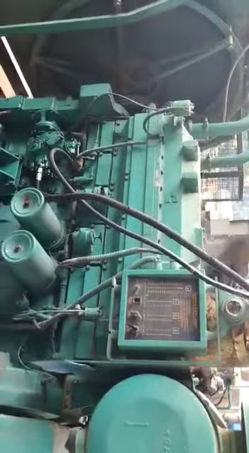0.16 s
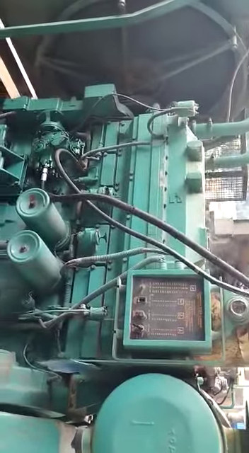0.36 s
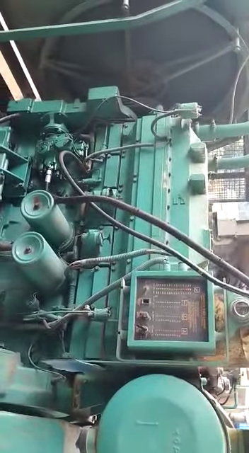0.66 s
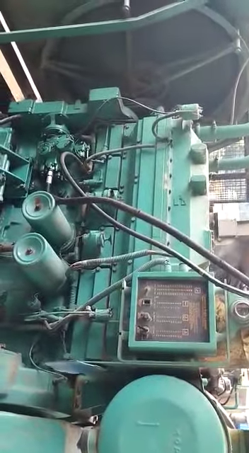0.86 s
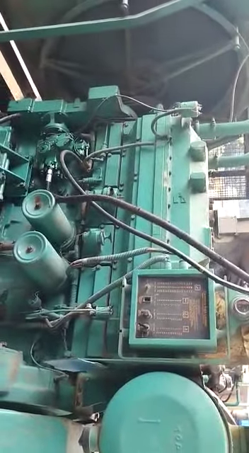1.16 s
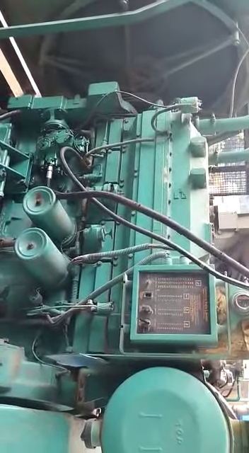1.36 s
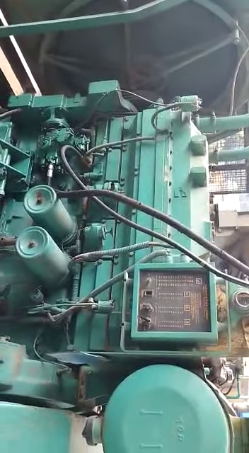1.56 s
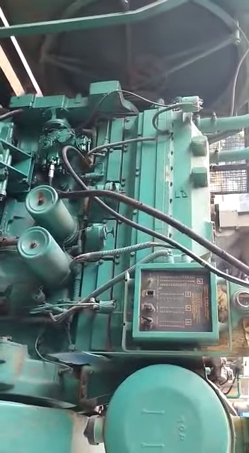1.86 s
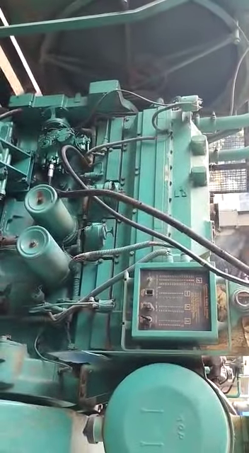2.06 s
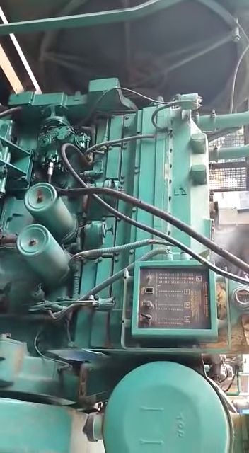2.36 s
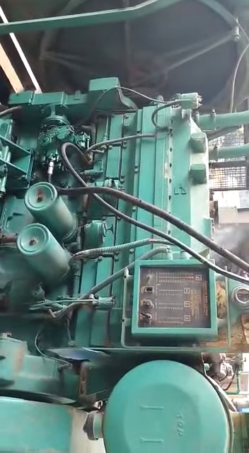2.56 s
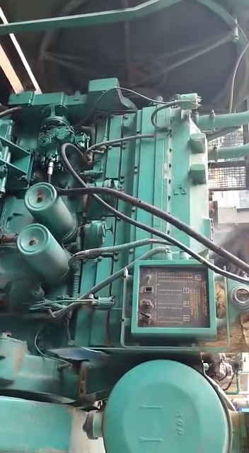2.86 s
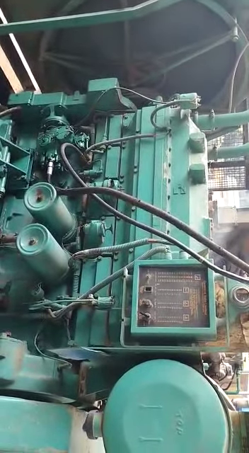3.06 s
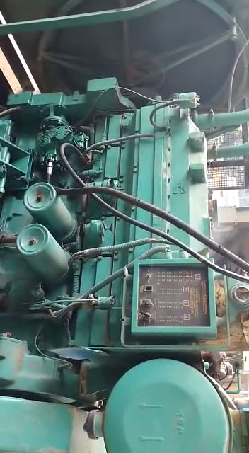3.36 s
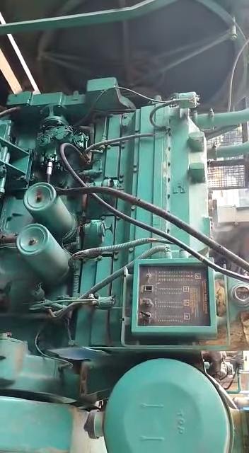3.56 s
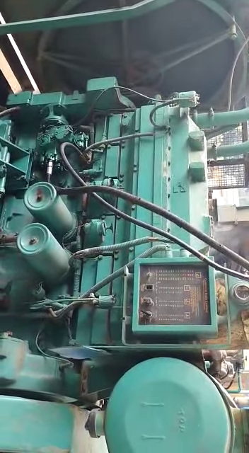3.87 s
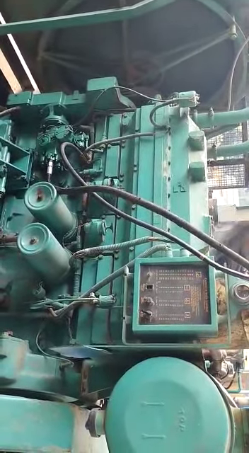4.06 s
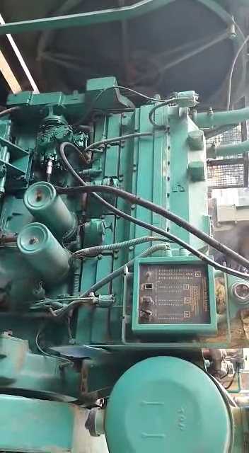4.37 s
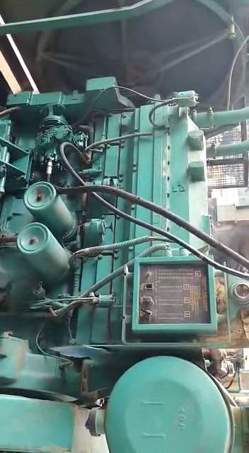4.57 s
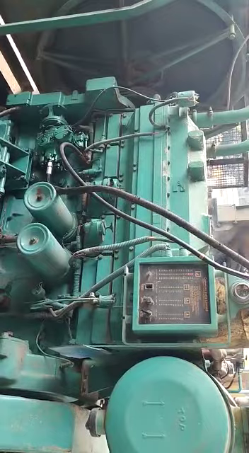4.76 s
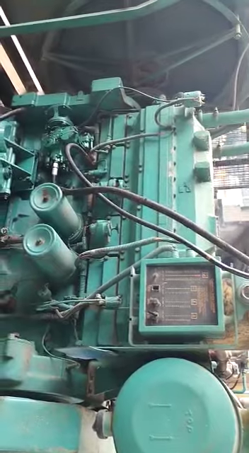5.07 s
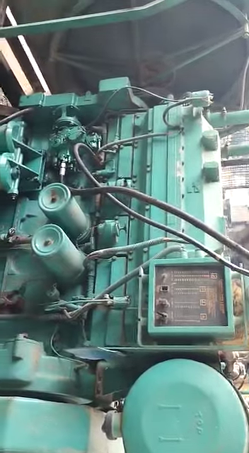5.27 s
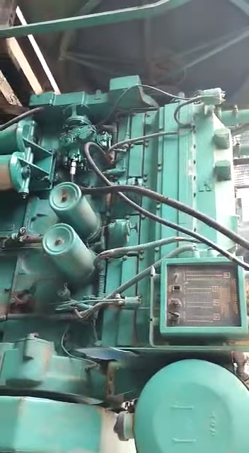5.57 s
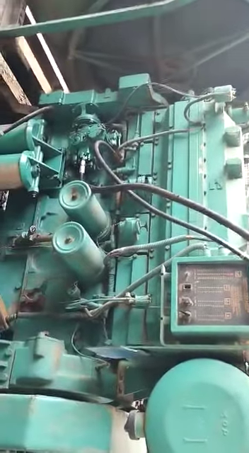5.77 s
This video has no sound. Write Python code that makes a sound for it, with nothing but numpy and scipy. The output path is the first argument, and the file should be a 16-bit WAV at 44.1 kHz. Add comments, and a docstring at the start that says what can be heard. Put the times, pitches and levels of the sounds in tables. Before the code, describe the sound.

A large six-cylinder diesel generator runs steadily at arm's length, humming in many tones, with growl, fan roar, casing clatter and uneven ticking.

```python
"""Diesel generator in a shed

A six-cylinder diesel generator runs at governed speed in its shed, an arm's length away.
Sines at firing and shaft orders make a many-toned hum, and a repeated waveform makes the block growl
the same way every cycle. Shaped noise makes the fan and exhaust roar and the casing clatter; noise
bursts make the injectors and valve gear tick in a limping pattern of six."""
import sys
import numpy as np
from scipy.fft import rfft, irfft, next_fast_len
from scipy.io import wavfile
from scipy.ndimage import uniform_filter1d, minimum_filter1d, map_coordinates

SR = 44100
rng = np.random.default_rng(int(sys.argv[2]) if len(sys.argv) > 2 else 0)


def unload_audio(sound):
    """Save the sound as a 16-bit wav file, at the path given as the first command line argument."""
    columns = np.transpose(np.atleast_2d(sound))
    # keep every value between -1 and 1, then stretch to whole-number steps
    steps = np.round(np.clip(columns, -1, 1) * 32767)
    wavfile.write(sys.argv[1], SR, steps.astype(np.int16))


N = 261513
CYLINDERS = 6
CYCLE_HZ = 14.915  # four-stroke cycles a second, two turns of the crank each


def amp(db):
    """Logarithmic level: decibels to amplitude gain."""
    return 10 ** (np.asarray(db) / 20)


def unit(x):
    """Power normalization: scale to rms 1."""
    return x / np.sqrt(np.mean(x ** 2) + 1e-20)


def along(points, hz):
    """Logarithmic interpolation: read (f/Hz, value) points on a log frequency axis."""
    f, v = np.transpose(points)
    return np.interp(np.log(hz + 1), np.log(f + 1), v)


def wobble(rate):
    """Band-limited fluctuation: a smooth random curve with rate knots a second."""
    knots = rng.standard_normal(int(N * rate / SR) + 4)
    coarse = np.arange(0, N + 64, 64)
    curve = map_coordinates(knots, [coarse * rate / SR])
    return np.interp(np.arange(N), coarse, curve)


def filtered(x, response):
    """Linear filtering: multiply the spectrum of x by a response of frequency."""
    m = next_fast_len(N + SR // 4)
    hz = np.fft.rfftfreq(m, 1 / SR)
    return irfft(rfft(x, m) * response(hz), m)[..., :N]


# likeness of the sound at the two microphones: f/Hz, left-right correlation
LIKENESS = [(30, 0.85), (90, 1), (220, 0.99), (380, 0.92), (660, 0.85), (870, 0.44), (1200, 0.45),
            (1700, 0.13), (2400, 0.012), (9000, 0.3)]


def spread(hz):
    """Spatial coherence: angle (rad) between mid and side; bass is shared, treble is diffuse."""
    return np.arccos(np.clip(along(LIKENESS, hz), -1, 1)) / 2


def rush(spectrum):
    """Coloured noise: random stereo sound of rms 1, so its spectrum sets only relative levels."""
    def mid_and_side(hz):
        return amp(along(spectrum, hz)) * [np.cos(spread(hz)), np.sin(spread(hz))]

    mid, side = filtered(rng.standard_normal((2, N)), mid_and_side)
    return unit(np.array([mid + side, mid - side]))


def crank(hunt=.002, shake=0.00048):
    """Phase modulation: engine cycles elapsed, as the governor hunts and no two cycles are quite alike."""
    steady = CYCLE_HZ * np.arange(N) / SR
    return steady + hunt * wobble(1.995) + shake * wobble(20)  # both depths in cycles


# roar of fan and exhaust: f/Hz, relative level per Hz/dB
ROAR_SPECTRUM = [(10, -21), (30, -23), (62, -14), (95, 0), (130, -7.5), (175, 1), (290, -1.5), (380, -7),
                 (490, -11), (680, -10), (1000, -23.5), (2500, -29.5), (7000, -37.5), (11000, -50)]


def fan():
    """Broadband flow noise: cooling air and exhaust roar in the shed, swelling at random."""
    gusts = amp(1.3 * wobble(7))
    return amp(-14.5) * unit(rush(ROAR_SPECTRUM) * gusts)


# the block's many weak orders, before random scatter: f/Hz, rms level of each order/dB
BLOCK_ORDERS = [(15, -52), (30, -32.5), (75, -41.5), (140, -30), (300, -31), (420, -42), (600, -37.5),
                (780, -35), (880, -45), (1300, -46.5), (2000, -52), (3000, -62), (4000, -61)]


def growl(cycle, strong, count=270, size=8192):
    """Fourier synthesis: the block repeats one waveform, filling in the orders between the strong tones."""
    orders = np.arange(count)
    hz = orders * CYCLE_HZ
    taken = [0] + [round(multiple) for multiple, db in strong]
    weak = ~np.isin(orders, taken)
    level = weak * amp(along(BLOCK_ORDERS, hz) + 1.4 * rng.standard_normal(count))
    start = rng.uniform(0, 2 * np.pi, count)
    # opposite phase shifts at the two microphones set their likeness
    angle = start + rng.choice([-1, 1], count) * spread(hz) * np.array([[1], [-1]])
    one_cycle = irfft(level * np.exp(1j * angle), size) * size / np.sqrt(2)
    place = np.arange(size) / size
    return np.array([np.interp(cycle % 1, place, port, period=1) for port in one_cycle])


def tones(cycle, table, waver, waver_rate):
    """Order synthesis: sines locked to the crank, each wavering on its own in the moving air."""
    out = np.zeros((2, N))
    for multiple, db in table:
        order = round(multiple)
        start = rng.uniform(0, 2 * np.pi)
        shift = rng.choice([-1, 1]) * spread(order * CYCLE_HZ)
        ports = np.exp(1j * (start + shift * np.array([[1], [-1]])))
        # the complex factor wavers both level and phase
        sway = 1 + waver * (wobble(waver_rate) + 1j * wobble(waver_rate))
        turning = np.exp(2j * np.pi * order * cycle)
        out += np.sqrt(2) * amp(db) * (ports * sway * turning).real
    return out


# thin whine of the pump drive, before wavering: multiple of the cycle rate, rms level/dB
PUMP_WHINE = [(87, -40), (103, -44)]
MESH_ORDER = 28  # gear teeth that meet in one cycle
GEAR_FIRST_DB, GEAR_DB = -37.5, -48.5  # rms before wavering: lowest mesh overtone heard, each one above


def gear_series(order=3, count=5):
    """Gear-mesh harmonics: the timing gears sing from the given order upwards; the lowest stands out."""
    return [(MESH_ORDER * k, GEAR_FIRST_DB if k == order else GEAR_DB)
            for k in range(order, order + count)]


def whine(cycle, table):
    """Tonal excitation at tooth-meeting rates: gears and pump drive waver strongly."""
    return tones(cycle, table, waver=0.53, waver_rate=12)


# firing tone and overtones: level up to a knee, then falling away
FIRING_DB, FIRING_KNEE_HZ, FIRING_FALL_DB_PER_OCTAVE = -18, 171.7, 10.5


def firing_series(count=9):
    """Harmonic series: the firing rate and its overtones, as (multiple of the cycle rate, level/dB)."""
    orders = CYLINDERS * np.arange(1, count + 1)
    octaves = np.log2(np.maximum(orders * CYCLE_HZ / FIRING_KNEE_HZ, 1))
    return list(zip(orders, FIRING_DB - FIRING_FALL_DB_PER_OCTAVE * octaves))


# shaft orders that frame and panels ring with, before wavering: multiple of the cycle rate, rms level/dB
PANEL_ORDERS = [(14, -21.5), (16, -26), (17, -19.5), (20, -18), (26, -21.5), (34, -30.5), (45, -28),
                (46, -30), (48, -31.5)]


def hum(cycle, table):
    """Forced vibration: firing and shaft orders drive frame and panels with nearly steady tones."""
    return tones(cycle, table, waver=.08, waver_rate=7)


# one tick for each cylinder: place in the cycle (0-1), relative sizzle level/dB, relative ring level/dB
CYLINDER_TICKS = [(.117, -2.5, 3.5), (.292, -3, 0), (.437, -5, 3), (.625, -19, -22), (.790, 1.5, 7.5),
                  (.972, -4, 2)]


def blows(cycle, levels_db, attack, t60, scatter_db, between_db):
    """Impact envelope of rms 1: each cylinder's blow rises fast and dies away over a steady rattle."""
    power = np.full(N, amp(between_db) ** 2)
    for (place, _, _), db in zip(CYLINDER_TICKS, levels_db):
        turn, part = np.divmod(cycle - place + 2, 1)
        age = part / CYCLE_HZ  # s since this cylinder's last blow
        strength = amp(db + scatter_db * rng.standard_normal(size=128))[turn.astype(int)]
        rise = 1 - np.exp(-age / attack)
        decay = amp(-60 * age / t60)
        power += (strength * rise * decay) ** 2
    return unit(np.sqrt(power))


# combustion clatter of the casing: f/Hz, relative level per Hz/dB
CLATTER_SPECTRUM = [(200, -40), (450, -5), (680, 2), (900, -1.5), (1300, -3.5), (1750, -5), (2300, -9),
                    (2900, -7), (3600, -10), (5000, -13), (6400, -14), (7200, -11.5), (9500, -24.5),
                    (11000, -30)]


def clatter(cycle, ignition_delay=0.0049):
    """Impulsive excitation: every firing rattles the casing, a moment (s) after its injector ticks."""
    late = cycle - ignition_delay * CYCLE_HZ
    firing = blows(late, np.zeros(len(CYLINDER_TICKS)),
                   attack=0.0012, t60=0.04, scatter_db=3.0, between_db=-0.5)
    return amp(-22.0) * firing * rush(CLATTER_SPECTRUM)


# steel ring of the ticks: f/Hz, relative level per Hz/dB
RING_SPECTRUM = [(1500, -21), (3000, -8), (4500, -4.5), (6300, -2.5), (7000, 8), (7500, -4), (9500, -8),
                 (11000, -33), (13000, -40)]
# sizzle of the ticks: f/Hz, relative level per Hz/dB
SIZZLE_SPECTRUM = [(6000, -60), (9000, -17), (10000, -12), (11000, -13), (12000, -4.5), (13000, 2),
                   (14200, 4.5), (15100, 2), (16000, -21)]


def injectors(cycle):
    """Impact radiation: steel ticks of uneven strength; their gritty sizzle beams at the left microphone."""
    _, sizzle_db, ring_db = np.transpose(CYLINDER_TICKS)
    knocks = blows(cycle, ring_db, attack=0.0011, t60=0.071, scatter_db=1.0, between_db=-7.5)
    ring = knocks * rush(RING_SPECTRUM)
    strokes = blows(cycle, sizzle_db, attack=.0007, t60=.06, scatter_db=.7, between_db=-10)
    grit = amp(1.0 * wobble(500))
    sizzle = unit(strokes * grit * rush(SIZZLE_SPECTRUM))
    return amp(-34.5) * ring + amp([[-27.3], [-37.7]]) * sizzle  # sizzle gains: left, right


# balance of the two microphones: f/Hz, left minus right level/dB
BALANCE = [(200, 0), (380, 0.3), (700, -2), (1300, -2.5), (2400, -1), (4400, -0.9), (8000, 1)]


def placed(x, lead=.00007):
    """Interaural differences: the left microphone leads (lead in s); the right one hears more midrange."""
    side = np.array([[.5], [-.5]])

    def response(hz):
        return amp(side * along(BALANCE, hz)) * np.exp(2j * np.pi * hz * lead * side)

    return filtered(x, response)


def scene():
    """Superposition: everything but the fan's roar keeps time with the crank."""
    cycle = crank()
    low = firing_series() + PANEL_ORDERS
    high = gear_series() + PUMP_WHINE
    background = fan() + growl(cycle, low + high)
    tonal = whine(cycle, high) + hum(cycle, low)
    return placed(background + tonal + clatter(cycle) + injectors(cycle))


# the recorder's deep treble notch: f/Hz, level/dB
TREBLE_NOTCH = [(7300, 0), (7550, -5), (7750, -22), (8150, -40), (8450, -20), (8800, -7), (9300, 0)]
TOP_HZ = 15780  # band limit


def record(dry, size=160):
    """Peak limiting and band limiting: a fast limiter (window in samples), then the recorder's treble notch."""
    ceiling = .94
    needed = np.minimum(1, ceiling / (np.abs(dry).max(axis=0) + 1e-9))
    gain = uniform_filter1d(minimum_filter1d(needed, size), size)
    return filtered(dry * gain, lambda hz: amp(along(TREBLE_NOTCH, hz)) * (hz < TOP_HZ))


dry = scene()
out = record(dry)
unload_audio(out)
```